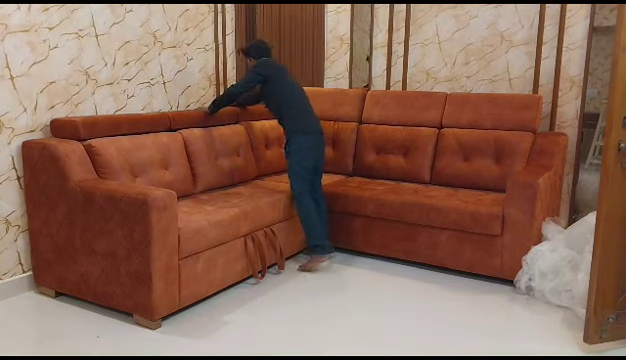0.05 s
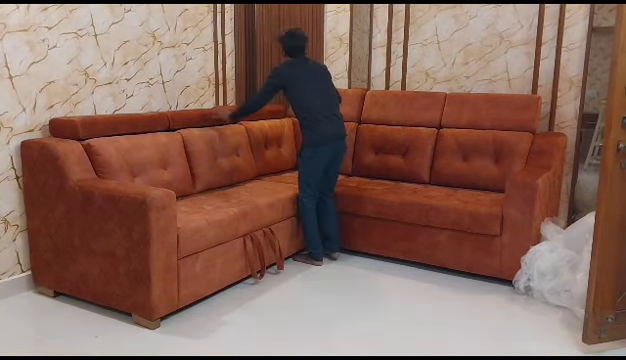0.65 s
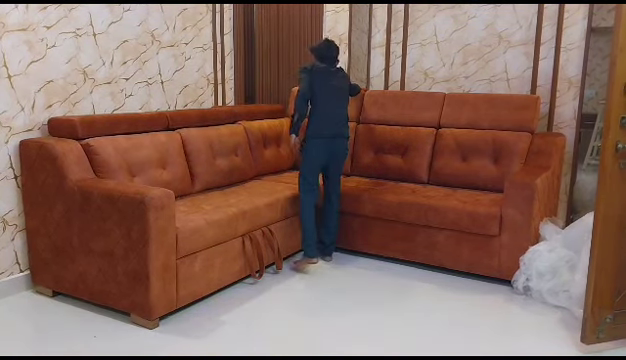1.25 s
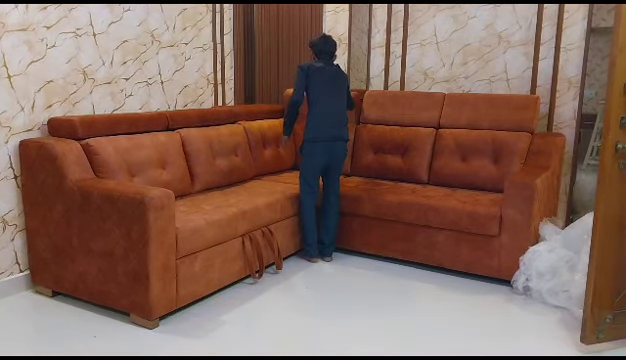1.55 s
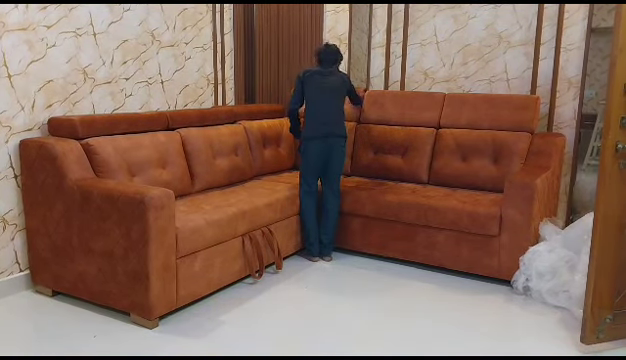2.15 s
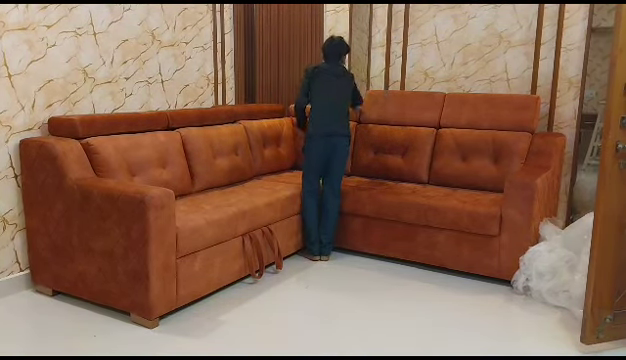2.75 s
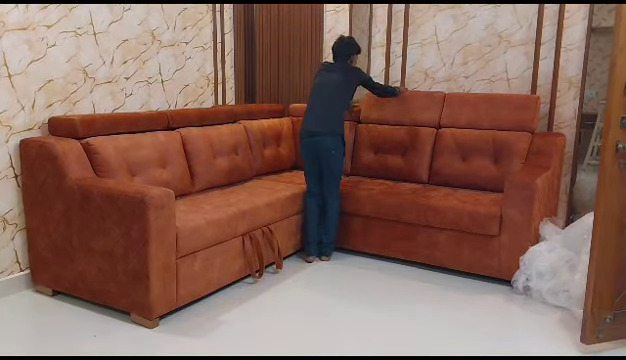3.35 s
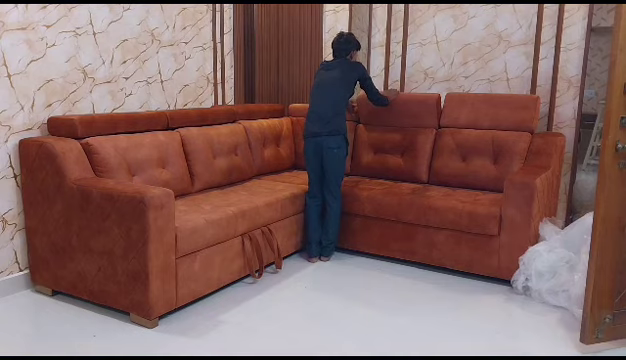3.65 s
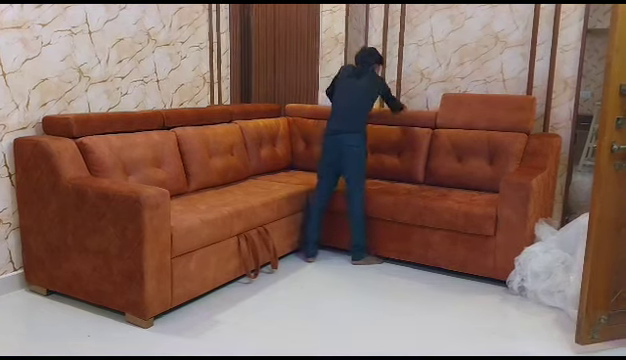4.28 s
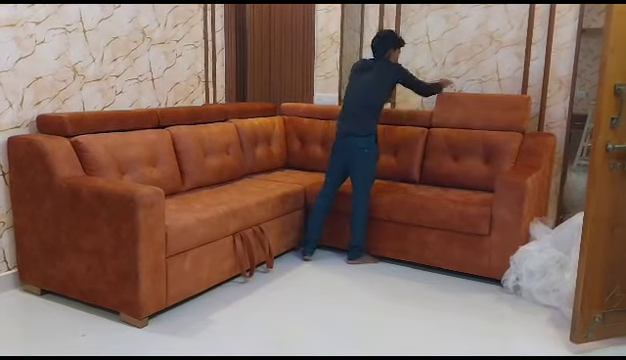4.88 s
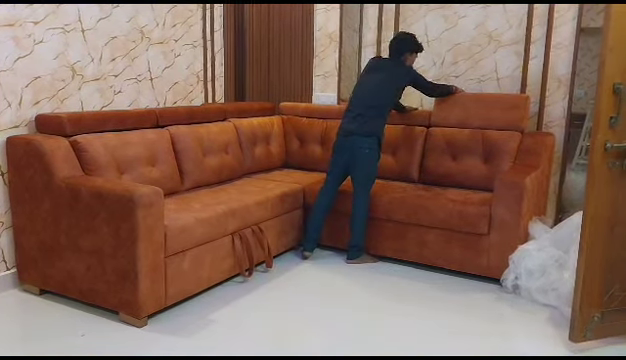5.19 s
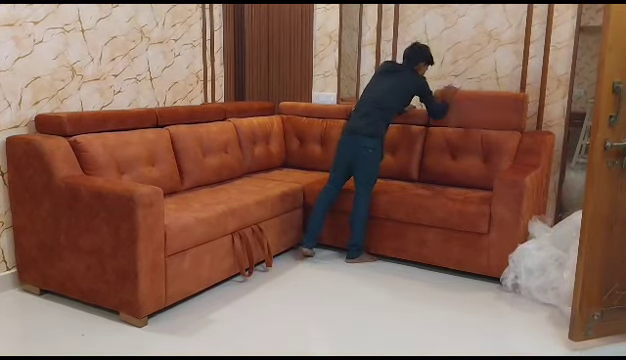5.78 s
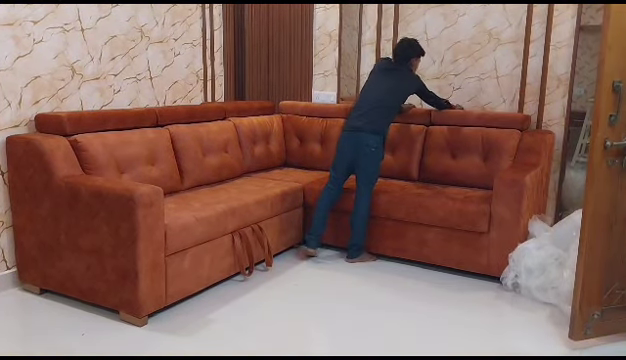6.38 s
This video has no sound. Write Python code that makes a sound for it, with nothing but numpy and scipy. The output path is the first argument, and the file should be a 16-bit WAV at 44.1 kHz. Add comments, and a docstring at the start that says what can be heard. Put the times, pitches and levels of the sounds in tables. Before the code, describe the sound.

Padded sofa headrests fold down one after another with steel ratchet clicks, dull hollow thuds and cloth rustling in a room.

```python
"""The padded headrests of a corner sofa fold down one after another in a hard-floored room.
Each steel ratchet hinge clicks free, then the headrest thuds onto the hollow wooden frame and bounces.
In between, cloth rustles, padding drags and squeaks faintly, and feet and knees bump the floor and base.
Behind it all is a faint room hiss that sinks after the hardest thuds as the recorder turns its gain down."""
import sys
import numpy as np
from scipy import signal
from scipy.fft import rfft, irfft, next_fast_len
from scipy.io import wavfile
from scipy.ndimage import uniform_filter1d, minimum_filter1d

SR = 44100
rng = np.random.default_rng(int(sys.argv[2]) if len(sys.argv) > 2 else 0)


def transcribe(signal):
    """Save signal, clipped to [-1, 1], as a 16-bit WAV file at the path in sys.argv[1]."""
    frames = np.atleast_2d(signal).T
    limited = np.clip(frames, -1, 1)
    pcm = np.round(limited * 32767).astype(np.int16)
    wavfile.write(sys.argv[1], SR, pcm)


N = 292383
TIME = np.arange(N) / SR


def from_db(db):
    """Turn decibels into a gain."""
    return 10 ** (np.asarray(db) / 20)


def rms_one(x):
    """Scale a sound to an average (rms) level of 1."""
    return x / np.sqrt(np.mean(x ** 2) + 1e-20)


def loudest_one(x):
    """Scale a hit to an rms level of 1 over its first twentieth of a second."""
    return x / np.sqrt(np.mean(x[:, :SR // 20] ** 2))


def at_hz(points, hz):
    """Read between the rows of a table, with octaves evenly spaced."""
    f, value = np.transpose(points)
    return np.interp(np.log(np.maximum(hz, 1)), np.log(f), value)


def add(out, s, sound):
    """Mix a sound in, starting at s seconds."""
    start = max(round(s * SR), 0)
    out[..., start:start + sound.shape[-1]] += sound[..., :N - start]


def drift(rate):
    """Glide to a new random value, rate times a second."""
    knots = rng.standard_normal(int(N / SR * rate) + 2)
    return np.interp(TIME * rate, np.arange(len(knots)), knots)


def lag(x, seconds):
    """Follow a signal slowly, smoothing out its jumps."""
    r = np.exp(-1 / (seconds * SR))
    return signal.lfilter([1 - r], [1, -r], x)


def resonate(x, hz, width_hz):
    """Ring at one pitch: the narrower the width, the longer the ring."""
    r = np.exp(-np.pi * width_hz / SR)
    feedback = [1, -2 * r * np.cos(2 * np.pi * hz / SR), r * r]
    return signal.lfilter(np.array([1, 0, -1]) * (1 - r * r) / 2, feedback, x + 1e-18)


# How alike the two sides sound. Each row: frequency in Hz, likeness from 0 (unrelated) to 1 (the same).
LIKENESS = [(60, 0.79), (150, 0.99), (300, 0.84), (600, 0.88), (1100, 0)]
def diffuse(spectrum, size):
    """Shaped noise from all around the room: left and right are alike only in the bass."""
    padded = next_fast_len(size, True)
    hz = np.arange(padded // 2 + 1) * SR / padded
    mid, side = rfft(rng.standard_normal((2, padded)))
    alike = at_hz(LIKENESS, hz)
    both = np.sqrt(1 + alike) * mid + np.sqrt(1 - alike) * side * [[1], [-1]]
    shaped = both * from_db(at_hz(spectrum, hz)) * (hz > 20)
    return rms_one(irfft(shaped, padded)[:, :size])


# The room's echo. Each row: frequency in Hz, seconds to fade by 60 dB (called t60).
ROOM_T60 = [(60, 1), (200, 0.86), (700, 0.7), (2500, 0.81), (6000, 0.74), (14000, 0.58)]
def burst(spectrum, build_s, early_db, early_s):
    """The room scatters a hit: echoes build up, near ones fade fast and the treble dies first."""
    t = TIME[:SR]
    hz, s, frames = signal.stft(diffuse(spectrum, size=SR), SR, nperseg=512)
    fade = from_db(-60 * s / at_hz(ROOM_T60, hz)[:, None])
    tail = signal.istft(frames * fade, SR)[1][:, :SR]
    early_boost = 1 + from_db(early_db) * np.exp(-t / early_s)
    return loudest_one(tail * (1 - np.exp(-t / build_s)) * early_boost)


def standing_waves(x, ripple_db=1.5, spacing_hz=22, above_hz=450):
    """The room favours some pitches and swallows others, in a different pattern on each side."""
    size = next_fast_len(N + SR // 4, True)
    hz = np.arange(size // 2 + 1) * SR / size
    knots = rng.standard_normal((2, SR // 10))
    pattern = np.array([np.interp(hz / spacing_hz, np.arange(len(k)), k) for k in knots])
    gain = rms_one(from_db(ripple_db * (pattern + pattern.mean(axis=0))))
    return irfft(rfft(x, size) * np.where(hz > above_hz, gain, 1), size)[:, :N]


# Each row: start in seconds, end in seconds, pitch in Hz, level in dB.
SQUEAKS = [(3.258, 3.385, 3420, -65), (6.45, 6.61, 9900, -71.5)]
def squeaks():
    """Thin, slightly wavering high notes sound briefly."""
    out = np.zeros(N)
    for start, end, hz, db in SQUEAKS:
        gate = uniform_filter1d(1. * ((TIME > start) & (TIME < end)), size=SR // 50)
        pitch = hz * (1 + 0.0069 * drift(320))
        out += from_db(db) * gate * np.sin(2 * np.pi * np.cumsum(pitch) / SR)
    return out


# Padding is pulled over the frame. Each row: start in seconds, length in seconds, level in dB.
PULLS = [(2.127, 0.28, -45), (3.844, 0.81, -46), (4.612, 0.17, -43.5), (5.334, 0.14, -27),
         (5.732, 0.14, -34.5), (5.935, 0.07, -38.5), (6.133, 0.14, -40)]
def pulling(rise_s=0.066, fade_s=0.074):
    """How hard the padding is pulled: each pull builds up, holds and dies away."""
    pull = np.zeros(N)
    for s, length, db in PULLS:
        rise = np.clip((TIME - s) / rise_s, 0, 1)
        pull += from_db(db) * rise * np.exp(-np.maximum(TIME - s - length, 0) / fade_s)
    return pull


# The tone of a low rub, a rustle and a soft swish. Each row: frequency in Hz, relative level in dB.
RUB_TONE = [(24, -29.5), (40, 8.5), (65, -15.5), (92, 1.5), (130, 0), (210, 0), (300, -3.5), (430, -11),
            (670, -8), (950, -29.5), (1500, -42), (4000, -61.5)]
RUSTLE_TONE = [(300, 0), (800, 5.5), (1200, -6.5), (1700, 2.5), (2400, -1), (3500, -2.5), (5000, -8),
               (7200, -11), (8300, -24), (10500, -21), (13500, -18), (16000, -30)]
SWISH_TONE = [(1500, -17), (7000, 9.5), (8500, -6), (13500, 6), (16000, -6)]
# Sleeves and palms brush the cloth. Each row: loudest moment in seconds, level in dB.
SWISHES = [(0.15, -73), (0.349, -72), (3.241, -63), (3.8, -68), (4.11, -68), (4.76, -67.5), (5.081, -60.5)]
def room_and_cloth(pull, rumble_db=-53, hiss_db=-59):
    """Each pull lifts a rub and a rustle out of the room's rumble and hiss; sleeves swish on top."""
    rub_level = np.hypot(from_db(rumble_db), from_db(-13.5) * pull)
    rub = rub_level * from_db(1.7 * drift(20)) * diffuse(RUB_TONE, size=N)
    rustle_level = np.hypot(from_db(hiss_db), from_db(-33) * pull)
    rustle = rustle_level * from_db(0.24 * drift(39)) * diffuse(RUSTLE_TONE, size=N)
    strokes = sum(from_db(db) * np.exp(-((TIME - s) / 0.09) ** 2) for s, db in SWISHES)
    hollow = resonate(rub, 91.4, 19) + resonate(rub, 651, 33) * from_db(0.5)   # the sofa's boxy base
    return from_db(-0.5) * (rub + hollow) + from_db(2) * rustle + strokes * diffuse(SWISH_TONE, size=N)


# The notes in the groan. Each row: pitch in Hz, width in Hz, relative level in dB.
GROAN_NOTES = [(201, 19.5, 6.5), (364, 52, -20), (611, 28, -9.5), (1490, 1240, -27.5), (1610, 41, -24.5)]
def drag(pull):
    """Padding sticks and slips on the frame and makes it groan."""
    slips = diffuse([(100, 0.5), (3000, -7.5), (8000, -14.5)], size=N) * from_db(2 * drift(30))
    return pull * rms_one(sum(from_db(db) * resonate(slips, hz, width) for hz, width, db in GROAN_NOTES))


# The tone of a steel clack. Each row: frequency in Hz, relative level in dB.
CLACK_TONE = [(200, 7), (500, 1.5), (760, 6.5), (1120, -8), (1600, -0.5), (2700, -1.5), (4000, -8.5),
              (6800, -18), (8500, -24), (16000, -54)]
def clank(ring_hz):
    """Steel meets steel: a clack and a ringing bracket."""
    strike = burst(CLACK_TONE, build_s=0.0044, early_db=13, early_s=0.025)
    ring = resonate(strike, ring_hz, width_hz=0.19 * ring_hz)
    clack = burst(CLACK_TONE, build_s=0.011, early_db=8.5, early_s=0.011)
    return from_db(-2) * clack + from_db(-6) * loudest_one(ring)


# The tone of a bright steel tick. Each row: frequency in Hz, relative level in dB.
TICK_TONE = [(2000, -4), (4500, 2.5), (7300, 3.5), (8500, -7.5), (10000, -3.5), (11500, -1.5), (13800, 1.5),
             (16000, -2.5)]
# The steel bracket's own notes. Each row: pitch in Hz, width in Hz, relative level in dB.
BRACKET_NOTES = [(1402, 36, -4), (1670, 56, 0), (2330, 34, 3.5)]
# Ratchet teeth and end stops. Each row: start in seconds, relative clack and tick levels in dB,
# ring pitch in Hz.
CLICKS = [(1.386, -40.5, -46.5, 794), (1.463, -40.5, -41.5, 3900), (1.596, -48, -58, 5830),
          (2.316, -41, -47.5, 5830), (2.338, -40, -57, 2870), (3.433, -39, -41.5, 800),
          (3.448, -38.5, -51, 2500), (3.497, -39.5, -40, 2500), (3.5, -43.5, -59, 730),
          (4.273, -38, -52.5, 2650), (4.296, -36, -66, 1490), (5.345, -44.5, -44, 820),
          (5.383, -40.5, -36.5, 740), (5.747, -57, -53.5, 1670), (5.966, -51, -82, 666),
          (6.208, -43.5, -47.5, 2670)]
def hinges():
    """A catch snaps over the ratchet's teeth: each gives a sharp tick, a steely splash and a clank."""
    out, t = np.zeros((2, N)), TIME[:SR // 20]
    for s, clack_db, tick_db, ring_hz in CLICKS:
        snap = diffuse(TICK_TONE, size=len(t)) * np.exp(-t / 0.0011)
        add(out, s, from_db(tick_db + 1) * snap)
        add(out, s + 0.02, from_db(tick_db + 6.5) * snap)   # echo off the wall behind
        add(out, s, from_db(tick_db - 1) * burst(TICK_TONE, build_s=0.01, early_db=12.5, early_s=0.021))
        add(out, s, from_db(clack_db) * clank(ring_hz))
    return out + sum(from_db(db - 4) * resonate(out, hz, width) for hz, width, db in BRACKET_NOTES)


def swing(hz, rise_s, t60):
    """A padded panel takes a moment to start shaking, then quickly settles."""
    t = TIME[:SR]
    envelope = (1 - np.exp(-(t / rise_s) ** 2)) * from_db(-60 * t / t60)
    return envelope / envelope.max() * np.sin(2 * np.pi * hz * t)


def thud(hz):
    """The short note of a padded panel."""
    return swing(hz, rise_s=0.0071, t60=0.096)


def boom(hz):
    """The slower, longer note of a large board."""
    return swing(hz, rise_s=0.0099, t60=0.23)


# The tone of knocked wood. Each row: frequency in Hz, relative level in dB.
KNOCK_TONE = [(26, -31.5), (37, -7), (130, 1.5), (220, 2), (320, -5), (430, -9), (680, -17), (1000, -24),
              (2000, -36), (5000, -68)]
def knock(build_s, early_db, early_s):
    """Shaken wood sends a dull noise into the room."""
    return burst(KNOCK_TONE, build_s, early_db, early_s)


# Each row: start in seconds, level in dB, pitch in Hz.
BUMPS = [(0.002, -41.5, 250), (0.539, -46.5, 259.5), (0.787, -46, 274), (0.816, -46.5, 118),
         (0.968, -44, 95.8), (1.14, -51.5, 110), (3.166, -31.5, 197), (5.05, -33, 182.5)]
def add_bumps(body, knocks, base_hz=54.2):
    """Feet and knees bump the floor and sofa; the hollow base answers a moment later."""
    for s, db, hz in BUMPS:
        add(body, s, from_db(db) * swing(hz, rise_s=0.0072, t60=0.1))
        add(body, s + 0.0255, from_db(db + 0.5) * boom(base_hz))
        add(knocks, s, from_db(db - 8) * knock(build_s=0.0033, early_db=-4, early_s=0.049))


PANEL_HZ, RAIL_HZ, SEAT_HZ = 207, 312.5, 107.9   # a jolted panel, the rail under it, the seat board
# Each row: start in seconds, panel thud level in dB and pitch in Hz, base boom level in dB and pitch in Hz,
# rail level in dB. The row at 1.625 s is the hard rebound of the landing just before it.
LANDINGS = [(1.557, -21.5, 192.2, -29, 63, -36.5), (1.625, -35, 274, -35.5, 61.6, -49),
            (2.336, -9.5, 178, -10.5, 56.4, -14.5), (3.569, -15, 249, -30.5, 63, -45),
            (4.299, -9.5, 179.5, -22.5, 58.3, -32), (5.458, -26, 285, -28.5, 49.35, -53),
            (6.289, -50, 172, -31, 60.3, -53)]
def add_landings(body, knocks, hard_landing_db=-9.5, bounce_loss_db=6):
    """A headrest lands, or rebounds hard, and then bounces three times: its panel thuds and the hollow base
    booms."""
    for s, thud_db, hz, boom_db, boom_hz, rail_db in LANDINGS:
        add(body, s, from_db(thud_db) * thud(hz) + from_db(boom_db) * boom(boom_hz))
        add(body, s, from_db(rail_db) * thud(RAIL_HZ))
        add(knocks, s, from_db(thud_db - 13) * knock(build_s=0.0023, early_db=-2.5, early_s=0.023))
        rebound_db = hard_landing_db - 11 + 2.8 * (thud_db - hard_landing_db)   # tiny for soft landings
        rebound = from_db(rebound_db) * (thud(PANEL_HZ) + boom(SEAT_HZ))
        rebound += from_db(boom_db - 11) * boom(boom_hz)
        flight_s = 0.122 * from_db(0.43 * boom_db)   # heavier landings fly longer
        for bounce in range(3):
            add(body, s + flight_s * (bounce + 1), from_db(-bounce_loss_db * bounce) * rebound)


# The room's first echoes. Each row: delay in seconds, level in dB.
ECHOES = [(.029, -9), (0.059, -10.5), (0.076, -8.5)]
# The notes of the frame and room. Each row: pitch in Hz, level in dB, seconds to fade by 60 dB.
FRAME_NOTES = [(54.9, -6, 0.91), (110, -6.5, 0.9), (185, -0.5, 0.51), (213, -8.5, 0.42), (221.2, 1, 1),
               (264.6, -1, 1), (304, 5, 0.88), (603, 11, 0.96), (710, -9, 0.6)]
def wooden_frame():
    """Landings set the frame and room ringing; bumps and ratchet teeth stir them lightly."""
    body, knocks = np.zeros(N), np.zeros((2, N))
    add_landings(body, knocks)
    add_bumps(body, knocks)
    for s, clack_db, _, _ in CLICKS:   # each tooth jolts the panel
        add(body, s, from_db(clack_db - 0.5) * thud(PANEL_HZ))
    echoes = sum(from_db(db) * np.interp(TIME - delay, TIME, body, left=0) for delay, db in ECHOES)
    ringing = sum(from_db(db) * resonate(body + knocks, hz, width_hz=np.log(1000) / (np.pi * t60))
                  for hz, db, t60 in FRAME_NOTES)
    return body + echoes + ringing + knocks


def scene():
    """Everything heard from across the room."""
    pull = pulling()
    return hinges() + wooden_frame() + standing_waves(room_and_cloth(pull) + drag(pull)) + squeaks()


def gain_control(x, threshold_db=-26.5, max_cut_db=8.5, hold_s=0.31, recovery_db_per_s=11):
    """A loud thud turns the gain down; it stays there a moment, then creeps back."""
    power = lag(np.mean(x ** 2, axis=0), seconds=0.093)
    excess_db = np.clip(10 * np.log10(power + 1e-12) - threshold_db, 0, max_cut_db)
    hold = int(hold_s * SR)
    held_db = -minimum_filter1d(-excess_db, hold, origin=(hold - 1) // 2)   # the biggest recent excess
    recovery_db = recovery_db_per_s * TIME
    cut_db = np.maximum.accumulate(held_db + recovery_db) - recovery_db
    return x * from_db(-lag(cut_db, seconds=0.48))


# The microphone's two openings. Each row: frequency in Hz, how much louder the left is in dB.
BALANCE = [(50, -0.5), (150, -1.5), (750, -4.5), (1400, 2), (2200, -3), (3100, -11), (4400, -0.5),
           (6000, -0.5), (8500, -0.5), (11000, -1), (13300, 9.5), (16000, 4)]
def record(dry):
    """The gain dips after loud thuds, each side gets its own tone, and the highest treble is cut."""
    size = next_fast_len(N + SR // 4, True)
    hz = np.arange(size // 2 + 1) * SR / size
    sides = from_db(at_hz(BALANCE, hz) * [[.5], [-.5]])
    sides /= np.sqrt(np.mean(sides ** 2, axis=0))
    low_pass = 1 / np.sqrt(1 + (hz / 15900) ** 200)
    return irfft(rfft(gain_control(dry), size) * sides * low_pass, size)[:, :N]


dry = scene()
out = record(dry)
transcribe(out)
```